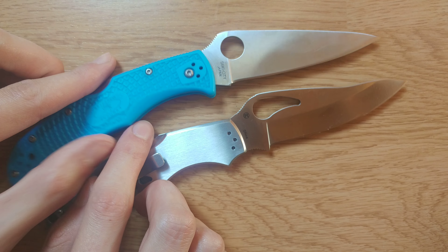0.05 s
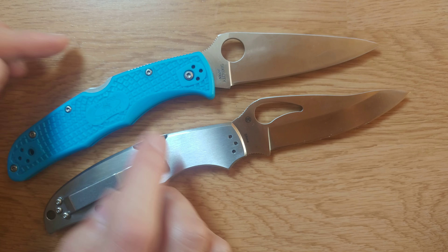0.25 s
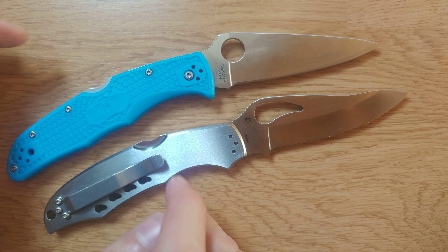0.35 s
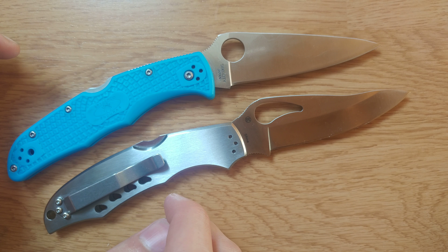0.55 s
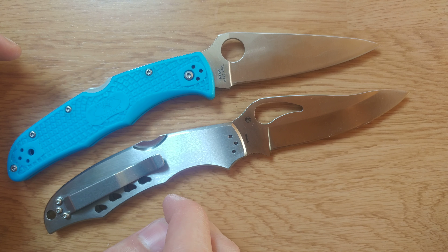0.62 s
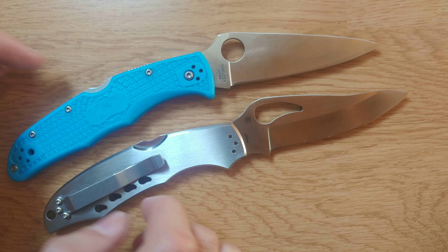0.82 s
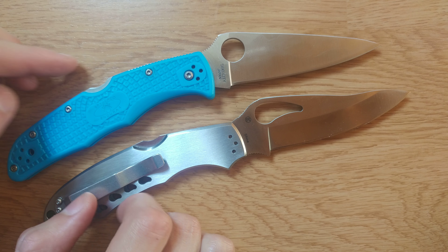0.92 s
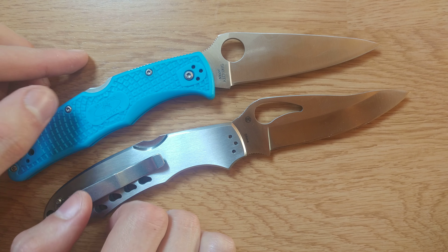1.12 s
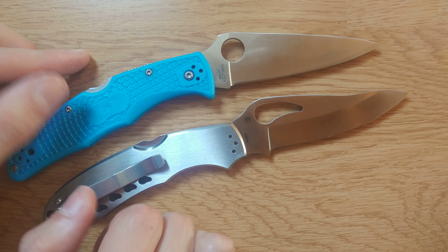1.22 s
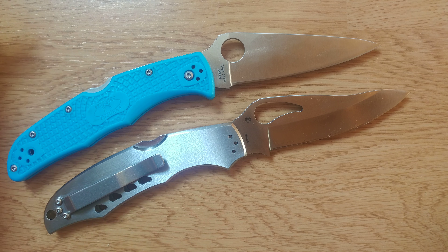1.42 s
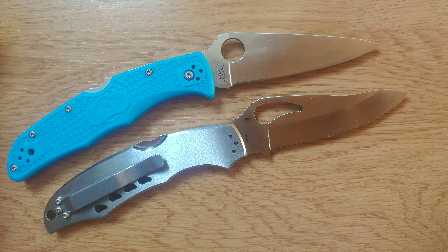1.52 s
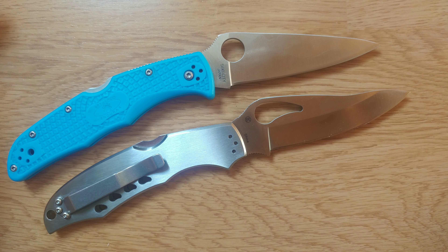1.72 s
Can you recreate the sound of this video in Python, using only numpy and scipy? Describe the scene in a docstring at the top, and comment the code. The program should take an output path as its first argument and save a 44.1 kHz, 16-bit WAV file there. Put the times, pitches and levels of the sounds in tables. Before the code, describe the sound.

A folding knife is laid on a wooden tabletop: after a quiet low rumble and a faint tick near 0.18 s, a tight run of woody knocks with a bright steel clack rattles from 0.20 to 0.30 s. A short low fingertip squeak dips and rises at 0.34-0.40 s. A small-room echo fades, leaving rumble, with faint ticks and rustle around 0.43, 0.96, 1.4 and 1.6 s. Close stereo phone pickup.

```python
"""A quiet room with a low rumble is heard first, with one faint tick; then a folding knife is laid on a
wooden tabletop: a quick run of knocks, one clack of the blade, and the squeak of a fingertip sliding off.
Faint ticks and rustle follow. The room is coloured noise; knocks, clack and ticks are short pushes or grit
that make fading tones ring; the squeak is a gliding tone; the echoes are fading noise. A phone's two
microphones hear it all."""
import sys
import numpy as np
from scipy import signal
from scipy.fft import rfft, irfft
from scipy.io import wavfile
from scipy.ndimage import uniform_filter1d

SR = 44100
rng = np.random.default_rng(int(sys.argv[2]) if len(sys.argv) > 2 else 0)


def master(y):
    """Save y as 16-bit WAV."""
    cut = np.clip(np.atleast_2d(y).T, -1, 1)
    pcm = np.round(cut * 32767)  # scale
    wavfile.write(sys.argv[1], SR, pcm.astype(np.int16))


N = 77175  # length in samples: 1.75 s


def undb(db):
    """Turn decibels into a plain multiplier."""
    return 10 ** (np.asarray(db) / 20)


def unit(x):
    """Scale a signal to an average (RMS) strength of 1."""
    return x / np.sqrt(np.mean(x ** 2))


def fade(age, t60):
    """A steady die-away that drops 60 dB in t60 seconds."""
    return 1000. ** (-age / t60)


def pan(db):
    """Multipliers that make left louder than right by this many dB."""
    return undb([[db / 2], [-db / 2]])


def shape(points, size):
    """Read a (f/Hz, level/dB) table as one gain per frequency bin; also return the bin frequencies."""
    hz = np.arange(size // 2 + 1) * SR / size + 1e-3  # the tiny offset avoids log(0)
    p = np.array(points, float)
    below = p[0, 1] - 30  # level under the first point
    db = np.interp(np.log(hz), np.log(p[:, 0]), p[:, 1], left=below)
    return undb(db), hz


def noise(points):
    """Two unrelated hisses, one for each side, tinted by a table."""
    spectrum = rfft(rng.standard_normal((2, N)))
    return unit(irfft(spectrum * shape(points, N)[0], N))


def walk(rate):
    """A smooth random wobble of RMS 1, with about `rate` new values per second."""
    k = int(SR / rate)
    steps = np.repeat(rng.standard_normal(N // k + 1), k)
    return unit(uniform_filter1d(steps, k)[:N])


def push(length_s):
    """A smooth single push: half a sine wave, whose samples add up to about 1."""
    return lambda age: np.sin(np.pi * np.clip(age / length_s, 0, 1)) * np.pi / (2 * length_s * SR)


RIGHT_LAG_S = .00045  # a blow reaches the right microphone this much later
SPOT_DB = 2.5  # random spread: each blow lands on another spot and favours other tones


def ring(modes, at_s, db, force):
    """A blow of shape force(age) sets off an object's own tones (modes), each fading at its own pace."""
    out, n = np.zeros((2, N + SR)), np.arange(SR // 2)
    spot = undb(SPOT_DB * rng.standard_normal(len(modes)))
    for ch in range(2):
        start = (at_s + ch * RIGHT_LAG_S) * SR
        first = int(start) + 1
        age = (n + 1 - start % 1) / SR  # keeps the timing finer than one sample
        body = 0
        for gain, mode in zip(spot, modes):
            tone = np.sin(2 * np.pi * mode[0] * n / SR) * fade(n / SR, mode[3])
            body = body + gain * undb(mode[1 + ch]) * tone
        out[ch, first:first + len(n)] = -signal.fftconvolve(body, force(age[:400]))[:len(n)]
    return out[:, :N] * undb(db)


# tint of the room tone: f/Hz, level/dB
AIR_COLOUR = [(18, -35), (30, -18.5), (59, 0.5), (90, 0), (165, -14), (244, -12.5), (391, -20), (495, -13),
              (643, -13.5), (695, -10), (1110, -24.5), (1650, -37.5), (3530, -43.5), (7540, -41),
              (8820, -50.5), (10900, -46), (15700, -57)]
# loudness of the room tone over time: t/s, bass level/dB, middle level/dB, treble level/dB
AIR_LEVELS = [(0.0, -56, -55.5, -70), (0.116, -59.5, -58, -75), (0.19, -59, -63.5, -76.5),
              (0.48, -62.5, -65.5, -75.5), (0.532, -58.5, -60, -79.5), (0.574, -72, -65.5, -78.5),
              (0.616, -59, -63.5, -78.5), (0.766, -72, -66.5, -81), (0.808, -58, -64.5, -79.5),
              (0.886, -73.5, -67.5, -81), (1.01, -54, -60.5, -77), (1.098, -63.5, -66.5, -80.5),
              (1.246, -53.5, -61, -77.5), (1.264, -65, -64.5, -79.5), (1.35, -58.5, -62, -77.5),
              (1.548, -59.5, -64.5, -77), (1.692, -55.5, -61.5, -77.5), (1.75, -70, -66, -79.5)]
ALIKE_HZ = 440  # well below this both microphones hear nearly the same tone
FLICKER_DB, THROB_DB = .9, 2.5  # random wobble of the middle and treble; of the bass
AIR_PAN_DB = -0.3


def air(t):
    """Room tone: noise in half-octave bands; the bass throbs, alike on both sides, the rest flickers."""
    gain, hz = shape(AIR_COLOUR, N)
    mid, side = rfft(rng.standard_normal((2, N))) * gain
    side = side * hz / np.hypot(hz, ALIKE_HZ)
    both = np.array([mid + side, mid - side])
    groups = np.zeros((3, 2, N))  # bass, middle, treble
    for f in 20 * 2 ** np.arange(0, 10, .5):
        octaves = np.log2(hz / f)
        window = np.cos(np.pi / 2 * np.clip(2 * octaves, -1, 1)) ** 2  # overlapping bands
        k = int(f > 160) + int(f > 1300)
        wobble_db = THROB_DB if k == 0 else FLICKER_DB
        groups[k] += irfft(both * window, N) * undb(walk(14) * wobble_db)
    out, levels = 0, np.array(AIR_LEVELS, float)
    for k, group in enumerate(groups):
        level = undb(np.interp(t, levels[:, 0], levels[:, k + 1]))
        out = out + group / np.std(group.mean(axis=0)) * level
    return out * pan(AIR_PAN_DB)


# echo off close surfaces, which dies fast: f/Hz, level/dB
NEARBY_ECHO = [(60, -19.5), (200, -12.5), (600, -8), (1100, -8), (1700, -6.5), (3000, -4), (5000, -0.5),
               (8000, 1.5), (15000, -6)]
# echo of the room, which rings on: f/Hz, level/dB
ROOM_ECHO = [(60, -23), (200, -11.5), (600, -3.5), (1200, -22), (2500, -16), (5000, -10.5), (8000, -14),
             (15000, -13)]
NEARBY_T60_S, ROOM_T60_S, ECHO_RISE_S = 0.11, 0.39, 0.001


def echo(x, t, points, t60):
    """Dense echo: the left signal is smeared by fading noise, different at each microphone."""
    tail = rng.standard_normal((2, N)) * (1 - np.exp(-t / ECHO_RISE_S)) * fade(t, t60)
    tail = tail / np.sqrt(np.sum(tail ** 2) / 2)
    return irfft(rfft(x[0]) * rfft(tail) * shape(points, N)[0], N)


# faint ticks: t/s, click level/dB, dull rustle level/dB, bright rustle level/dB, rustle rise/s, rustle t60/s
TICKS = [(0.176, -63, -57, -66.5, 0.0038, 0.13), (0.4279, -51, -61.5, -53.5, 0.00039, 0.076),
         (0.959, -87, -70, -74, 0.028, 0.57), (1.39, -89, -78, -73, 0.006, 0.27),
         (1.458, -71, -77.5, -67.5, 0.0015, 0.2), (1.6098, -48, -70, -61, 0.0015, 0.15)]
# tones of a click: f/Hz, left level/dB, right level/dB, t60/s
CLICK_MODES = [(1870, -1, -5, 0.0049), (2850, -12, -10, .003), (3855, 0.5, -3, 0.0058),
               (5400, -7, -1, 0.0027), (7400, 0, 4, .005), (11660, 5, -8, 0.0022)]
# tint of the dull rustle: f/Hz, level/dB
DULL_COLOUR = [(1000, -18), (1800, -3.5), (2800, -5), (4200, -2), (6000, -21)]
# tint of the bright rustle: f/Hz, level/dB
BRIGHT_COLOUR = [(3000, -19), (5000, -3), (7300, -1), (8900, -12.5), (12000, -14), (15000, -20)]


def ticks(t):
    """Each tick is a dry click from a very short push, with a rustle of noise that swells and fades."""
    dull, bright = noise(DULL_COLOUR), noise(BRIGHT_COLOUR)
    grain = undb(1.2 * walk(100))  # slight unevenness
    out = 0
    for at, click_db, dull_db, bright_db, rise, t60 in TICKS:
        age = np.maximum(t - at, 0)
        swell = (1 - np.exp(-age / rise)) * fade(age, t60)
        rustle = (undb(dull_db) * dull + undb(bright_db) * bright) * grain * swell
        out = out + rustle + ring(CLICK_MODES, at, click_db, push(.00006))
    return out


# fingertip squeak: t/s, slip rate f/Hz, level/dB, level of the tone an octave up/dB
SQUEAK = [(0.335, 437, -57, -59), (0.339, 432.6, -48, -56), (0.349, 420.6, -43, -47.5),
          (0.365, 369, -40.5, -50), (0.375, 324.6, -41.5, -45), (0.385, 358.4, -39.5, -56.5),
          (0.393, 377, -42, -46), (0.399, 361.4, -71, -64), (0.405, 368, -59, -54), (0.43, 380, -60, -72)]
SQUEAK_PAN_DB = 5


def squeak(t):
    """Skin sticks and slips at a gliding rate, which gives a tone and its octave."""
    s, hz, db, octave_db = np.array(SQUEAK).T
    phase = 2 * np.pi * np.cumsum(np.interp(t, s, hz)) / SR
    tone = undb(np.interp(t, s, db)) * np.sin(phase)
    octave = undb(np.interp(t, s, octave_db)) * np.sin(2 * phase + 1.6)
    gate = np.clip((t - s[0]) / 0.0055, 0, 1) * np.clip((s[-1] - t) / 0.0093, 0, 1)  # fade in and out
    rough = undb(0.63 * walk(200))
    return np.sqrt(2) * (tone + octave) * gate * rough * pan(SQUEAK_PAN_DB)


# contacts of knife and table: t/s, knock level/dB, thud level/dB, steel level/dB
HITS = [(0.2034, -23, -48.5, -35), (0.215, -38, -48, -16), (.2170, -23, -28, -41),
        (0.2193, -23, -58, -37.5), (.2425, -15, -42.5, -30), (0.2443, -22, -42, -28),
        (.2570, -20, -50, -34), (.2715, -28, -30, -29.5), (0.2865, -17.5, -44.5, -34.5),
        (0.3011, -46, -37.5, -42)]
# tones of the wooden board: f/Hz, left level/dB, right level/dB, t60/s
BOARD_MODES = [(82, -18.5, -16, 0.32), (120.3, -5, -4, 0.25), (156, 4, 2.5, .1), (218, 5.5, -2.5, .07),
               (284.3, 0.5, -2.5, 0.053), (334.7, 1.5, -11.5, 0.068), (471, -1.5, -8, 0.052),
               (554.3, -2.5, -3, 0.098), (628, -3, -5, .08)]
# tones of the knife handle: f/Hz, left level/dB, right level/dB, t60/s
HANDLE_MODES = [(820, -18, -18, 0.021), (987, -3.5, -25, 0.022), (1097.4, -0.5, -8.5, 0.031),
                (1317, -10.5, -20, 0.032), (1475, -8.5, -11, 0.022), (1750, -11, -20.5, 0.022),
                (2015, -6, -21, 0.014), (2484, -16.5, -13.5, 0.02)]
# tones of the steel blade: f/Hz, left level/dB, right level/dB, t60/s
STEEL_MODES = [(2614, -10.5, -13, 0.011), (3085, -6, -17, 0.0081), (3598, -5, -7.5, .012),
               (3985, -3, -6, .008), (4530, -4, -23, .008), (4806, 0.5, -2, 0.011), (5300, -5, -5, 0.0094),
               (5900, -1, -7, .008), (6600, -6.5, -11, 0.014), (7140, -5.5, -2, 0.0088),
               (7700, -19, -9.5, .01)]
THUD_PUSH_S, KNOCK_PUSH_S, CHATTER_S = .0012, 0.00024, 0.001  # a longer push sounds duller


def knife():
    """Each contact thuds the board, knocks the handle and makes the steel chatter under fading grit."""
    out = 0
    grits = rng.standard_normal((len(HITS), 400))
    for (at, knock_db, thud_db, steel_db), grit in zip(HITS, grits):
        chatter = lambda age: grit * np.exp(-age / CHATTER_S) / np.sqrt(CHATTER_S * SR)
        knock = ring(HANDLE_MODES, at, knock_db, push(KNOCK_PUSH_S))
        thud = ring(BOARD_MODES, at, thud_db, push(THUD_PUSH_S))
        steel = ring(STEEL_MODES, at, steel_db, chatter)
        out = out + knock - thud + steel  # the board moves the opposite way
    return out


SQUEAK_WET_DB = -7  # how much of the squeak feeds the echoes
MIC_LOW_HZ, MIC_HIGH_HZ, MIC_TOP_DB = 65, 8900, -10


def scene():
    """Knife and squeak with echoes, thinned in the bass and treble, plus the ticks and the room tone."""
    t = np.arange(N) / SR
    hits, skin = knife(), squeak(t)
    sent = hits + undb(SQUEAK_WET_DB) * skin
    echoes = echo(sent, t, NEARBY_ECHO, NEARBY_T60_S) + echo(sent, t, ROOM_ECHO, ROOM_T60_S)
    near = hits + skin + echoes
    near = signal.sosfilt(signal.butter(4, MIC_LOW_HZ, "high", fs=SR, output="sos"), near)
    # the treble steps down above MIC_HIGH_HZ
    top = signal.sosfiltfilt(signal.butter(4, MIC_HIGH_HZ, "high", fs=SR, output="sos"), near)
    near = near - (1 - undb(MIC_TOP_DB)) * top
    return near + ticks(t) + air(t)


TOP_HZ = 15450


def record(dry):
    """The phone cuts off the highest treble, above TOP_HZ, with a steep filter."""
    return signal.sosfilt(signal.ellip(8, .2, 70, TOP_HZ, fs=SR, output="sos"), dry)


dry = scene()
out = record(dry)
master(out)
```